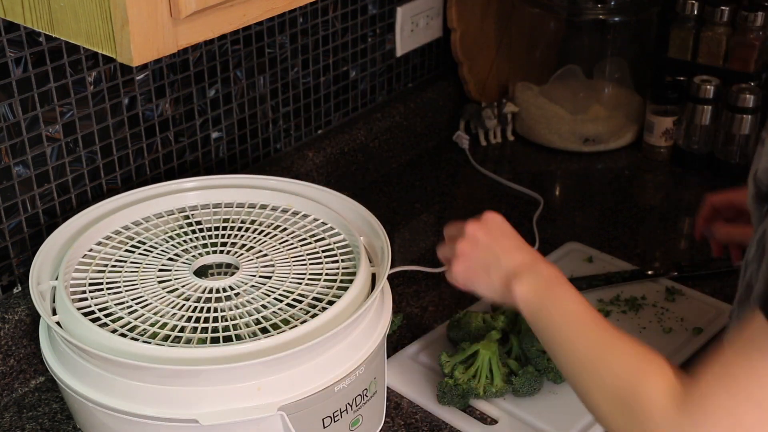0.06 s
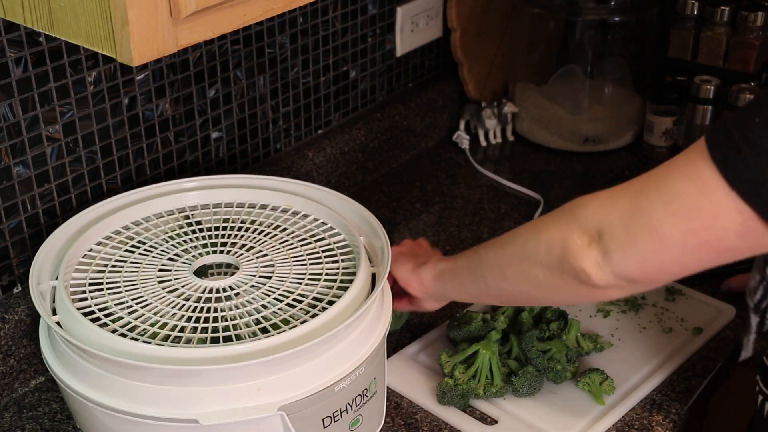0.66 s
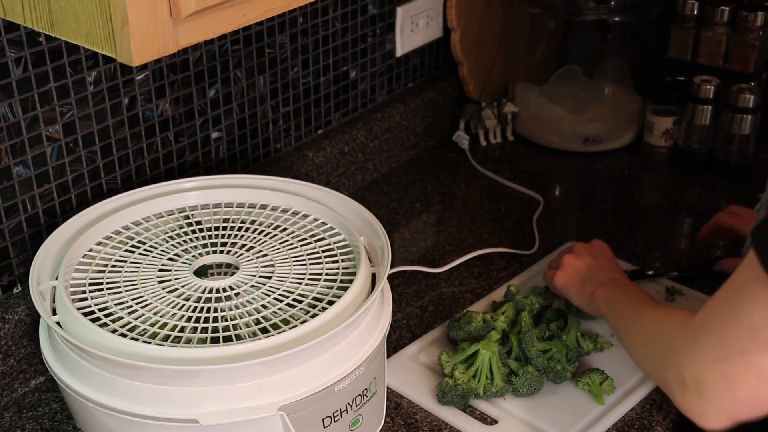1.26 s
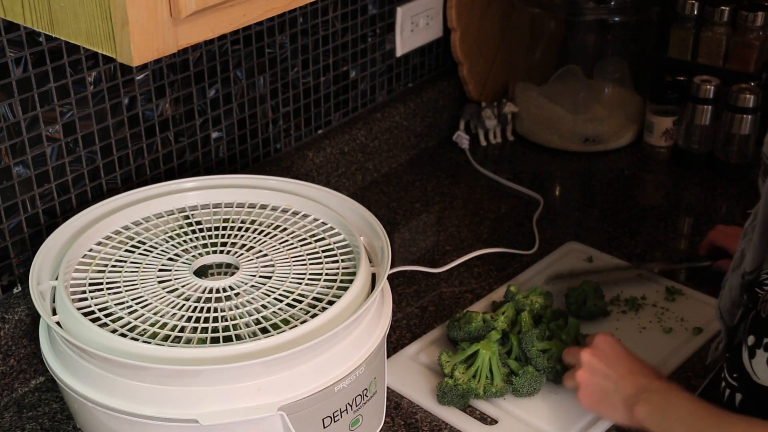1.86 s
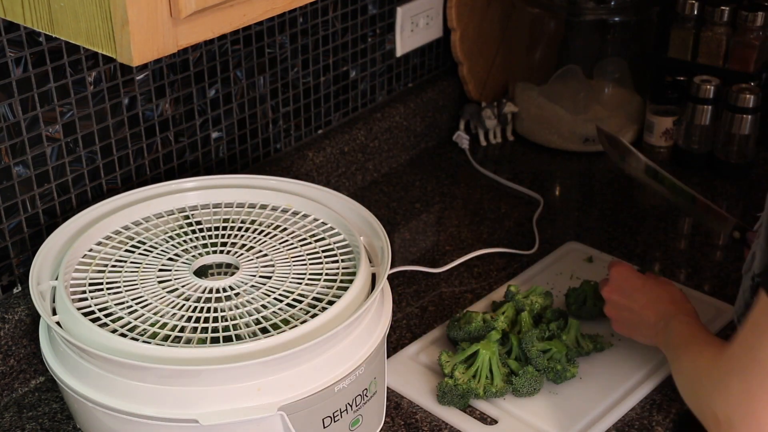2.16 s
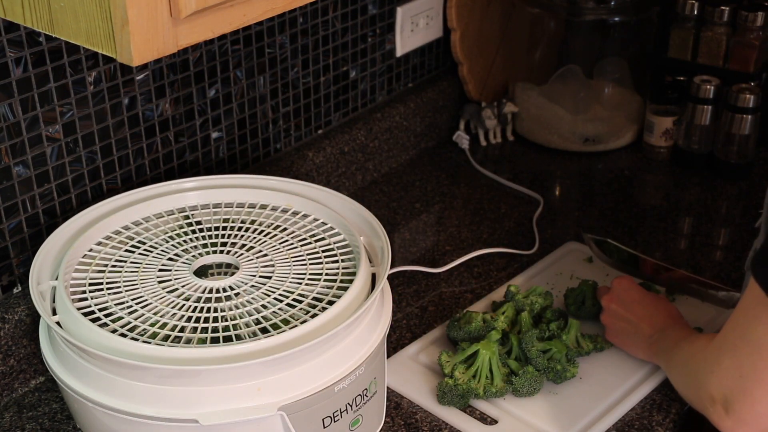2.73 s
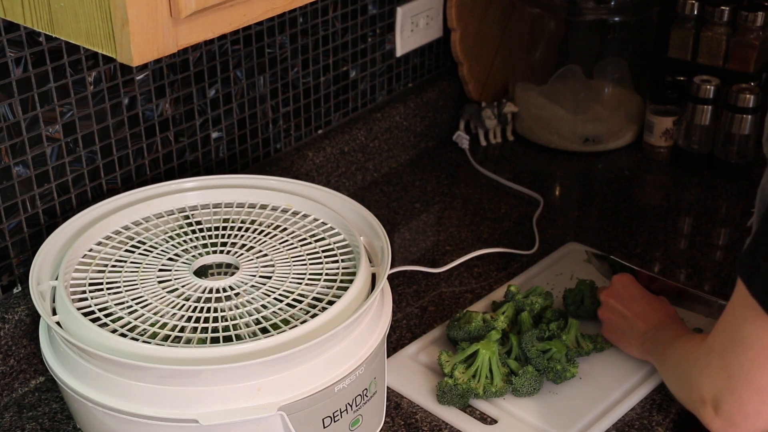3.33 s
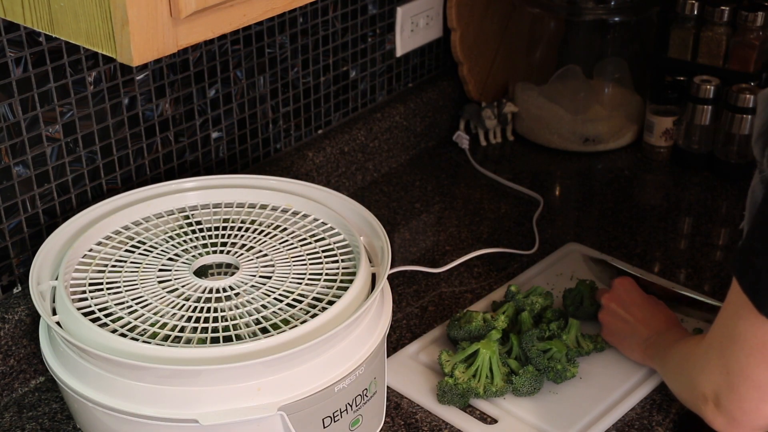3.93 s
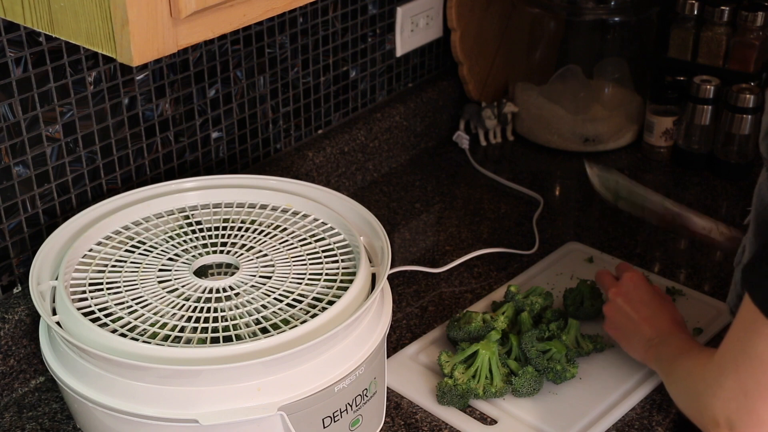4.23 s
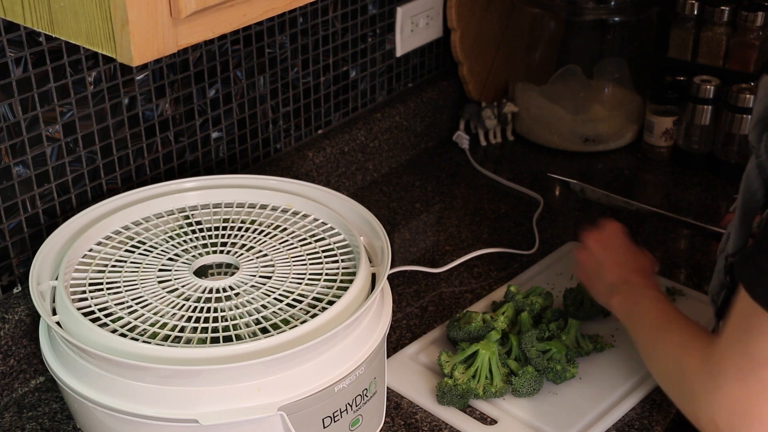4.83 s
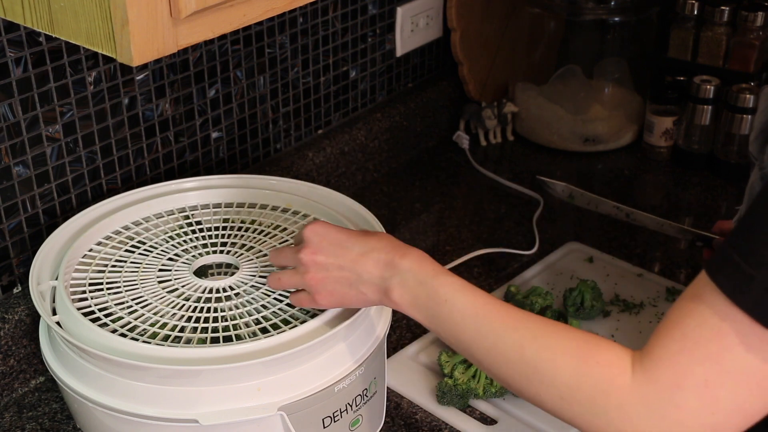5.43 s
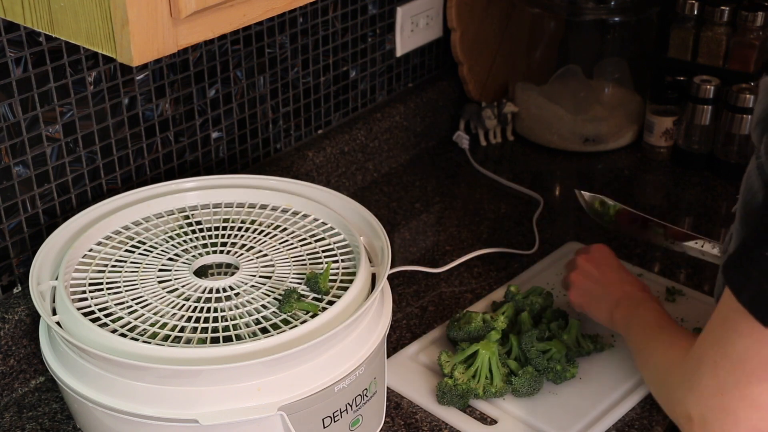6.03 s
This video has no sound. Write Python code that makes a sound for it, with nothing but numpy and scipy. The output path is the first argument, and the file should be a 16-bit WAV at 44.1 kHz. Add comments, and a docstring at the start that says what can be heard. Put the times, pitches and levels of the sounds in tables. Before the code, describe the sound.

A refrigerator hums faintly in an even rush of air in a small kitchen. Close to the stereo microphones, broccoli florets rustle quietly during the first half second, with a tiny tick of stalk at 0.3 seconds and a soft bump on a plastic cutting board at 0.7. Two dull bumps and a brief rustle come around 1.8 seconds, then a knife taps the board lightly at 2.0. Two very faint deep thuds and a slight bump follow. At 3.7 seconds the knife chops once through a stalk, by far the loudest sound: a short crunch and a sharp knock that briefly rings the board and booms through the worktop. At about 4 seconds a last bit of stalk snaps with a light knock. One more muffled bump comes at 5.3 seconds. The whole sound fades gradually, reaching near silence at about 6 seconds.

```python
"""Broccoli on a plastic cutting board, close to a stereo pair of microphones in a small kitchen.
Florets rustle as their fibres give way and bump the board; a knife chops once through a stalk and
sets the board ringing, then a last bit of stalk snaps. Weight on the board booms through the worktop.
Behind it a refrigerator's compressor hums in a rush of air, and the whole sound slowly fades out."""
import sys
import numpy as np
from scipy import signal
from scipy.fft import rfft, irfft, next_fast_len
from scipy.io import wavfile
from scipy.ndimage import map_coordinates

SR = 44100
rng = np.random.default_rng(int(sys.argv[2]) if len(sys.argv) > 2 else 0)


def master_out(mix):
    """Clip the mix to full scale and print it as 16-bit PCM to the path in sys.argv[1]."""
    frames = np.transpose(np.atleast_2d(mix))
    ceiling = np.clip(frames, -1, 1)
    pcm = np.round(ceiling * 32767).astype(np.int16)
    wavfile.write(sys.argv[1], SR, pcm)


N = 268172


def amp(db):
    """Decibels to gain."""
    return 10 ** (np.asarray(db) / 20)


def unit(x):
    """Scaled to rms 1."""
    return x / np.sqrt(np.mean(x ** 2) + 1e-20)


def along(points, hz):
    """(Hz, value) points read on a log axis."""
    point_hz, values = np.transpose(points)
    return np.interp(np.log(hz + 1), np.log(point_hz + 1), values)


def wobble(rate):
    """A smooth random curve, rate knots a second."""
    knots = rng.standard_normal(int(N * rate / SR) + 4)
    return map_coordinates(knots, [np.arange(N) * rate / SR])


def filtered(x, response):
    """x through a gain that depends on frequency."""
    size = x.shape[-1]
    padded = next_fast_len(size + 8192)
    hz = np.fft.rfftfreq(padded, 1 / SR)
    return irfft(rfft(x, padded) * response(hz), padded)[..., :size]


def softened(x, hz, order):
    """Causal low-pass: a softer contact has less treble."""
    return signal.sosfilt(signal.butter(order, min(hz, SR / 2 - 1000), fs=SR, output="sos"), x)


def noise(spectrum, likeness, size):
    """Stereo noise of rms 1 with a given colour and left-right likeness."""
    def mid_side_gains(hz):
        angle = np.arccos(np.clip(along(likeness, hz), -1, 1)) / 2
        return amp(along(spectrum, hz)) * [np.cos(angle), np.sin(angle)]
    mid, side = filtered(rng.standard_normal((2, size)), mid_side_gains)
    return unit(np.array([mid + side, mid - side]))


def add(track, start_s, sound):
    """Mix a sound into the track."""
    part = track[:, round(start_s * SR):][:, :sound.shape[-1]]
    part += sound[..., :part.shape[-1]]


def ringing(modes, t):
    """One dying sine for each mode."""
    return [amp(db - 60 * t / t60) * np.sin(2 * np.pi * hz * t) for hz, db, t60 in modes]


# The compressor, in the background. Each row: multiple of the shaft speed, level in dB.
COMPRESSOR_HARMONICS = [(3, -70), (4, -65), (9, -57.5), (11, -54), (15, -67), (19, -71.5), (23, -70.5),
                        (26, -71.5), (33, -76), (34, -72.5), (35, -64), (36, -67), (38, -70.5), (39, -64.5),
                        (41, -84.5), (42, -73.5), (44, -69), (45, -74.5), (46, -83), (47, -72), (49, -84),
                        (54, -75), (68, -75)]

def refrigerator(shaft_hz=58.78, drift=.0005, waver_db=0.87, spread_hz=2600):
    """Harmonics of the compressor shaft; the higher ones reach the two microphones out of step."""
    turns = np.cumsum(shaft_hz * (1 + drift * wobble(3))) / SR
    out = np.zeros((2, N))
    for multiple, db in COMPRESSOR_HARMONICS:
        lag = rng.choice([-1, 1]) * min(multiple * shaft_hz / spread_hz, np.pi / 2) / 2
        phase = 2 * np.pi * (multiple * turns + rng.random())
        peak = np.sqrt(2) * amp(db + waver_db * wobble(3.4))
        out += peak * np.sin([phase + lag, phase - lag])
    return out


# Room tone. Each row: frequency in Hz, spectral level in dB.
AIR_SPECTRUM = [(20, -9), (50, -3.5), (110, -7.5), (230, -4.5), (330, -4), (580, -1.5), (850, -6),
                (1200, -12.5), (1800, -13.5), (2600, -14.5), (4500, -19), (6000, -21.5), (10000, -24.5),
                (15500, -29.5)]
# Its width across the pair. Each row: frequency in Hz, left-right correlation.
AIR_LIKENESS = [(60, 0.76), (300, 0.82), (640, .9), (1400, 0.47), (3100, 0), (7000, 0)]

def air(rush_db=-50):
    """The kitchen's even rush of moving air, all around the microphones."""
    return amp(rush_db) * noise(AIR_SPECTRUM, AIR_LIKENESS, size=N)


# Fibres giving way, heard close. Each row: frequency in Hz, spectral level in dB.
FIBRE_SPECTRUM = [(200, -14), (600, 5), (1200, -0.5), (2200, 1.5), (3200, -2.5), (5000, -4.5), (7000, -8),
                  (15000, -11.5)]
# Short rustles; a brief hiss swells just before the chop.
# Each row: peak in seconds, rise in seconds, level in dB, treble cutoff in Hz.
RUSTLES = [(0.07, .4, -53.5, 5560), (0.45, 0.28, -48, 14000), (1.795, 0.087, -50, 5200),
           (3.665, 0.055, -37.5, 7060), (3.97, .12, -50.5, 5000)]
# A stalk ticks or snaps under the blade. Each row: peak in seconds, level in dB, treble cutoff in Hz.
STALK_SNAPS = [(0.289, -39.5, 8200), (3.669, -39.5, 15000), (4.048, -29, 4600)]

def broccoli(grain_db=2.0, grain_rate=600, rustle_fall_ratio=.6, snap_rise_s=0.0045, snap_fall_s=.03):
    """Tiny fibres give way in clumps: a rustle swells and stops more quickly, a snap starts at once."""
    t = np.arange(N) / SR
    hiss = noise(FIBRE_SPECTRUM, ROOM_LIKENESS, size=N)
    fibres = unit(hiss * amp(grain_db * wobble(grain_rate)))
    strokes = []  # each rise and fall spans 20 dB
    for peak_s, rise_s, db, cutoff_hz in RUSTLES:
        from_peak = np.maximum(peak_s - t, (t - peak_s) / rustle_fall_ratio) / rise_s
        strokes.append((db - 20 * from_peak ** 2, cutoff_hz))
    for peak_s, db, cutoff_hz in STALK_SNAPS:
        from_peak = np.maximum((peak_s - t) / snap_rise_s, (t - peak_s) / snap_fall_s)
        strokes.append((db - 20 * from_peak, cutoff_hz))
    return sum(softened(fibres * amp(np.maximum(envelope_db, -160)), cutoff_hz, order=4)
               for envelope_db, cutoff_hz in strokes)


# Florets and fingers on the board. Each row: start in seconds, level in dB.
SOFT_BUMPS = [(0.733, -36), (1.746, -28), (1.827, -25), (3.281, -39), (5.325, -26)]

def soft_contacts(cutoff_hz=410.6, crack_db=-12.5):
    """Florets and fingers land softer than steel, all equally dull."""
    return [(start_s, db, cutoff_hz, crack_db) for start_s, db in SOFT_BUMPS]


# The knife meets the board as it is picked up, chops, and finishes the cut.
# Each row: start in seconds, level in dB, treble cutoff in Hz, crack in dB relative to that level.
KNIFE_BLOWS = [(2.006, -28, 1180, -13.5), (3.6705, -0.5, 7120, -16), (4.0502, -29, 1300, -3.5)]

def knife_contacts(tip_lead_s=.0032, flight_s=.022, shrink=.8, rebound_db=-16, loss_db=1.5, dulling=.58):
    """The blade lands tip first, then with its whole edge, and rebounds ever faster and duller."""
    contacts = []
    for at_s, db, cutoff_hz, crack_db in KNIFE_BLOWS:
        tip = (at_s - tip_lead_s, db - 8.5, cutoff_hz * 1.7, crack_db + 3)  # lighter and brighter
        edge = (at_s, db, cutoff_hz, crack_db)
        contacts += [tip, edge]
        for k in range(3):
            at_s += flight_s * shrink ** k
            contacts.append((at_s, db + rebound_db - loss_db * k, cutoff_hz * dulling ** k, crack_db))
    return contacts


# The plastic board with the blade on it. Each row: frequency in Hz, level in dB, T60 in seconds.
BOARD_MODES = [(238, -18, 0.11), (357, -22.5, 0.1), (372, -16.5, 0.13), (449.5, -14.5, 0.08),
               (512, -12, 0.094), (624, -3.5, 0.03), (688, -10, .1), (806, -12, 0.11), (1002, -34.5, 0.99),
               (1053, -1.5, .045), (1156, -11, 0.029), (1193, -2, 0.028), (1490, -23, 0.037),
               (1463, -10.5, 0.057), (1670, -24.5, 0.032), (1980, -32.5, 0.05), (2667, -28.5, 0.028),
               (4990, -23, 0.016)]
# The crack of a contact. Each row: frequency in Hz, spectral level in dB.
CRACK_SPECTRUM = [(100, -12), (400, 2), (1400, 7.5), (2200, -4), (3200, -12.5), (4200, -13), (5000, -9.5),
                  (6000, -27.5), (8000, -23), (15000, -31)]

def board(contacts, crack_t60=0.14, ring_db=-4, radiate_hz=170):
    """Each contact rings the board's modes under a short crack."""
    out, t = np.zeros((2, N)), np.arange(SR // 2) / SR
    # neighbouring modes reach the microphones in opposite phase, so the knock takes a moment to bloom
    ring = amp(ring_db) * sum((-1) ** k * mode for k, mode in enumerate(ringing(BOARD_MODES, t)))
    for start_s, db, cutoff_hz, crack_db in contacts:
        crack = amp(crack_db - 60 * t / crack_t60) * noise(CRACK_SPECTRUM, ROOM_LIKENESS, size=len(t))
        add(out, start_s, amp(db) * softened(ring + crack, cutoff_hz, order=2))
    # a small board radiates hardly any bass
    return signal.sosfilt(signal.butter(2, radiate_hz, "high", fs=SR, output="sos"), out)


# Weight put on the board. Each row: start in seconds, level in dB.
PUSHES = [(1.741, -38.5), (2.006, -48), (3.668, -29.5), (4.047, -35.5)]
# The worktop under the board. Each row: frequency in Hz, level in dB, T60 in seconds.
WORKTOP_MODES = [(80.4, -14.5, 0.31), (184.3, -2, 0.31), (242, -2.5, .15)]
# Two faint, deep thuds before the chop. Each row: start in seconds, level in dB.
THUDS = [(2.19, -56), (2.65, -51)]
# Their resonances. Each row: frequency in Hz, level in dB, T60 in seconds.
THUD_MODES = [(49.3, 1, .7), (79.4, -1, .3)]

def worktop(attack_s=0.0054):
    """Slow pushes excite just the low resonances, which boom alike in both microphones."""
    out, t = np.zeros((2, N)), np.arange(SR // 2) / SR
    swell = 1 - np.exp(-t / attack_s)
    for events, modes in (PUSHES, WORKTOP_MODES), (THUDS, THUD_MODES):
        boom = swell * sum(ringing(modes, t))
        for start_s, db in events:
            add(out, start_s, amp(db) * boom)
    return out


# The small kitchen's echo. Each row: frequency in Hz, T60 in seconds.
ROOM_DECAY = [(100, .3), (300, 0.44), (1000, 0.24), (3000, 0.24), (6000, 0.26), (14000, 0.3)]
# Width of the echo, fibres and cracks across the pair. Each row: frequency in Hz, left-right correlation.
ROOM_LIKENESS = [(200, .97), (700, .94), (1400, .82), (3000, 0.16), (7000, 0.089)]

def kitchen(direct, wet_db=-5.5, delay_s=0.0049, build_s=0.012):
    """Nearby tiles and cupboards answer within milliseconds; the low mids linger longest."""
    near_white = noise([(20, 0.017), (20000, 0.0099)], ROOM_LIKENESS, size=SR // 2)
    hz, t, spectra = signal.stft(near_white, SR, nperseg=256)
    decay = amp(-60 * t / along(ROOM_DECAY, hz)[:, None])
    tail = signal.istft(spectra * decay, SR, nperseg=256)[1]
    since_arrival = np.maximum(np.arange(tail.shape[1]) / SR - delay_s, 0)
    tail *= 1 - np.exp(-since_arrival / build_s)
    echo = signal.fftconvolve(direct, tail / np.linalg.norm(tail[0]), axes=1)[:, :N]
    return direct + amp(wet_db) * echo


def fader(open_gain=0.79, fade_s=4.46, silent_at_s=5.952):
    """The fader closes along a quarter sine and just reopens past its silent point."""
    opening = np.abs(silent_at_s - np.arange(N) / SR) / fade_s
    return open_gain * np.sin(np.pi / 2 * np.minimum(opening, 1))


def scene():
    """Work at the board in front, refrigerator and room tone behind."""
    knocks = board(soft_contacts() + knife_contacts())
    return kitchen(knocks + broccoli()) + worktop() + refrigerator() + air()


# The balance of the microphone pair. Each row: frequency in Hz, left minus right in dB.
MIC_BALANCE = [(60, 2.5), (200, .5), (600, 1), (1300, -1.5), (2400, 0.6), (4400, -0.5), (8000, -.5)]

def record(dry, top_hz=15720):
    """Two slightly unequal microphones feed the fader; nothing passes above the band limit."""
    pair = filtered(dry, lambda hz: amp(np.outer([.5, -.5], along(MIC_BALANCE, hz))))
    return filtered(pair * fader(), lambda hz: hz < top_hz)


dry = scene()
out = record(dry)
master_out(out)
```